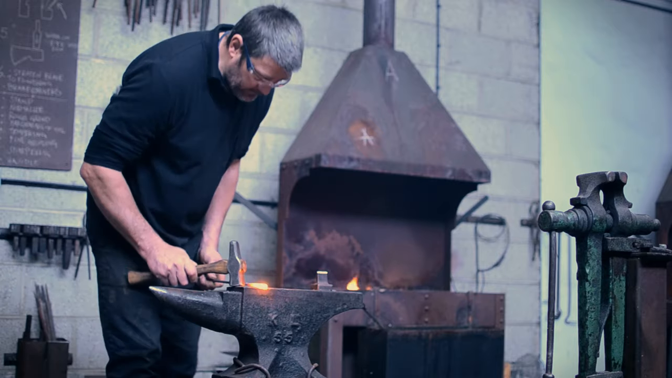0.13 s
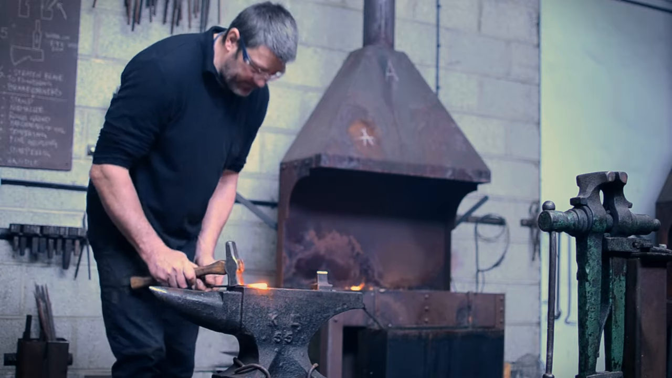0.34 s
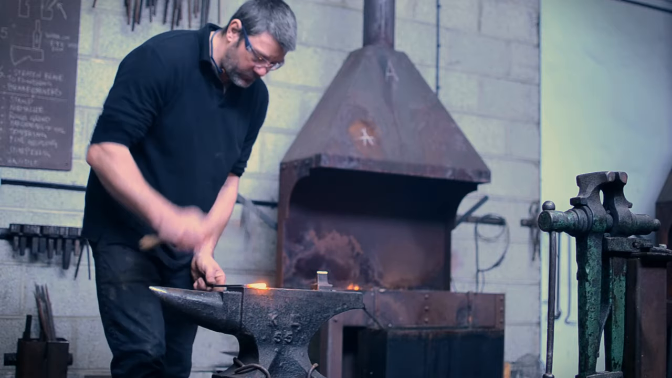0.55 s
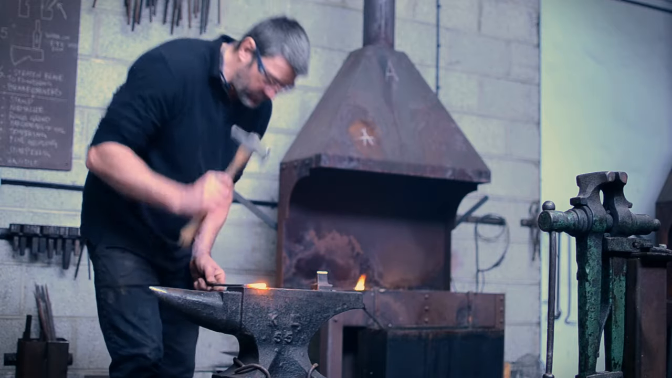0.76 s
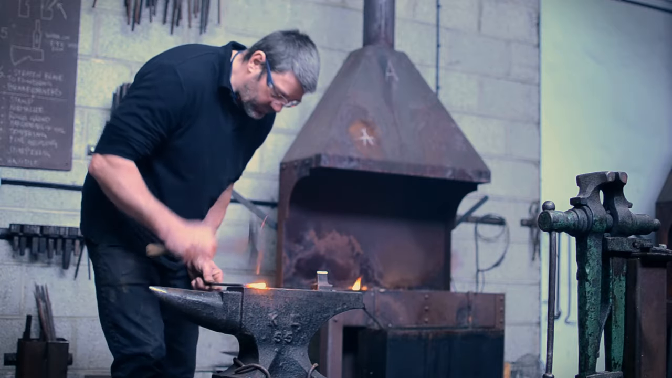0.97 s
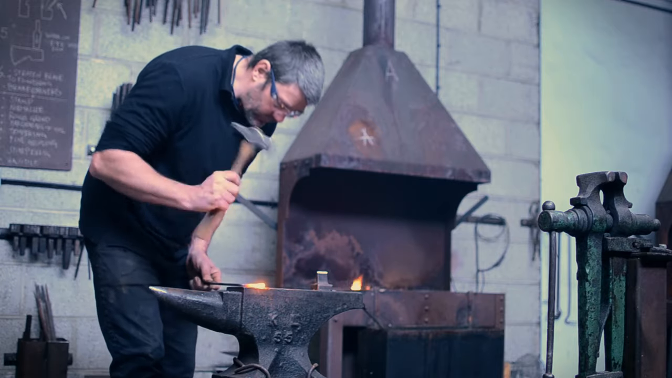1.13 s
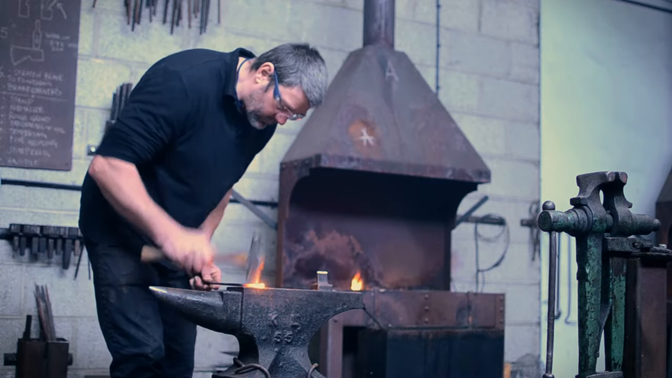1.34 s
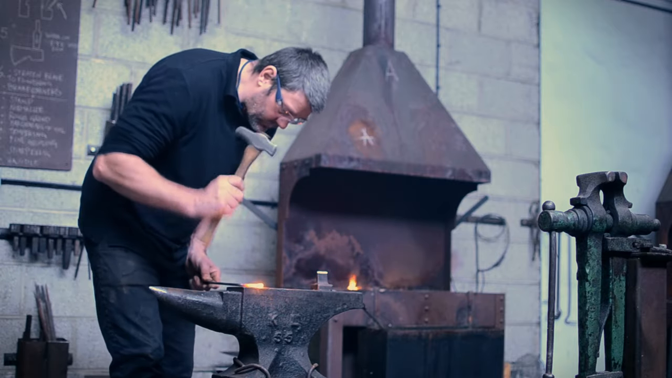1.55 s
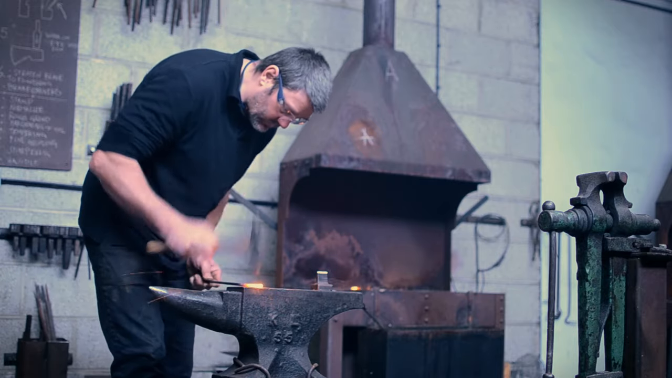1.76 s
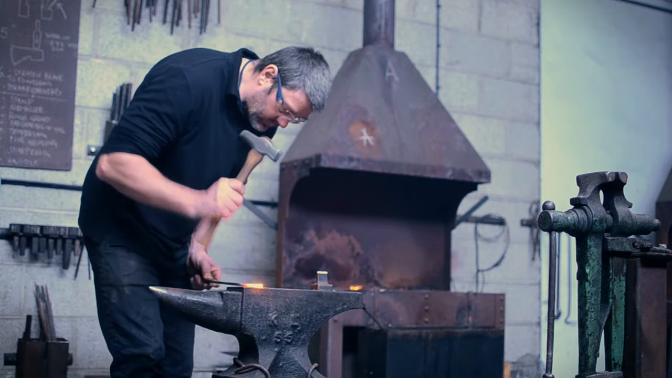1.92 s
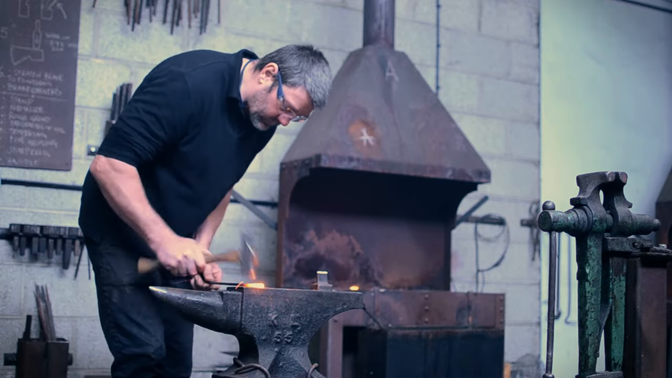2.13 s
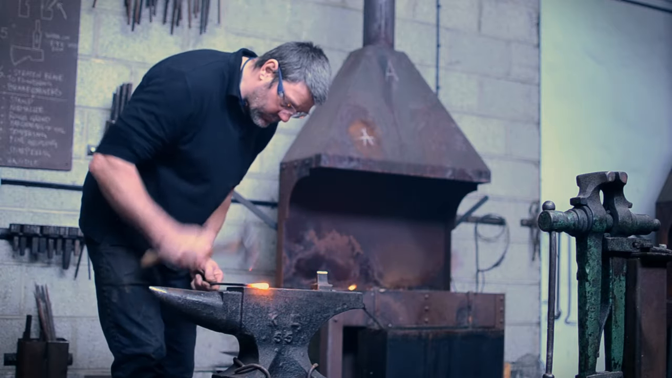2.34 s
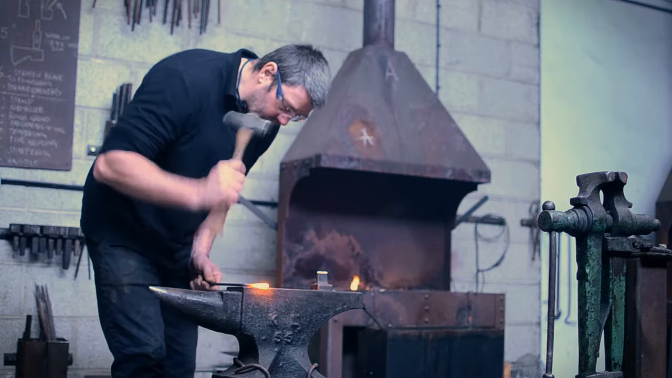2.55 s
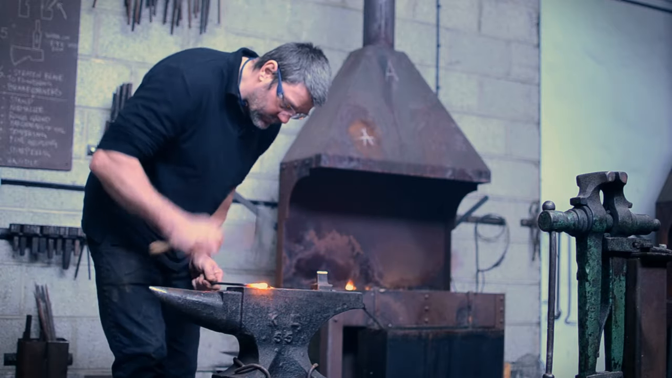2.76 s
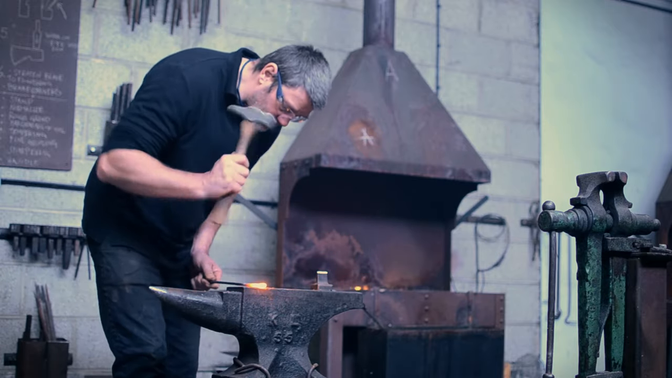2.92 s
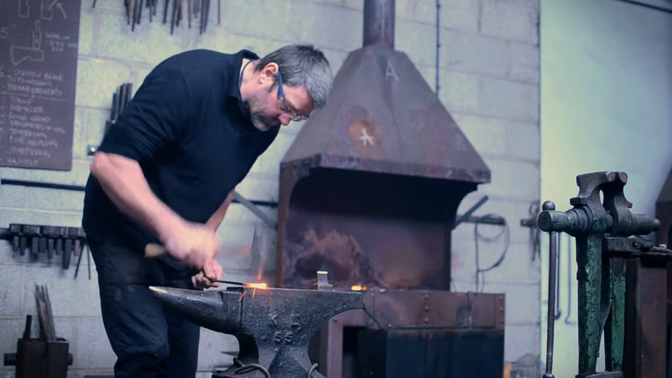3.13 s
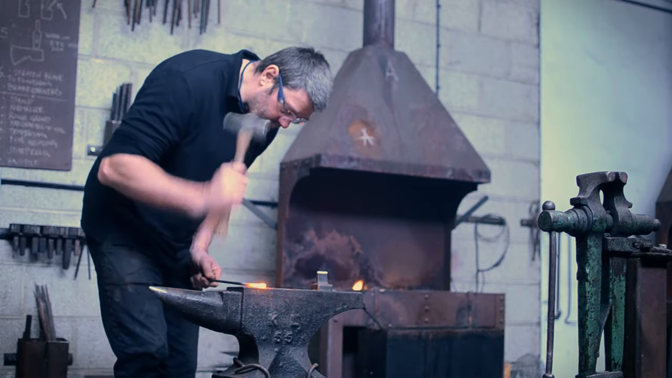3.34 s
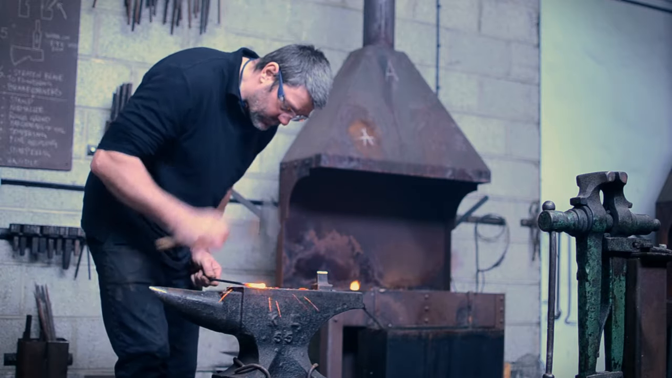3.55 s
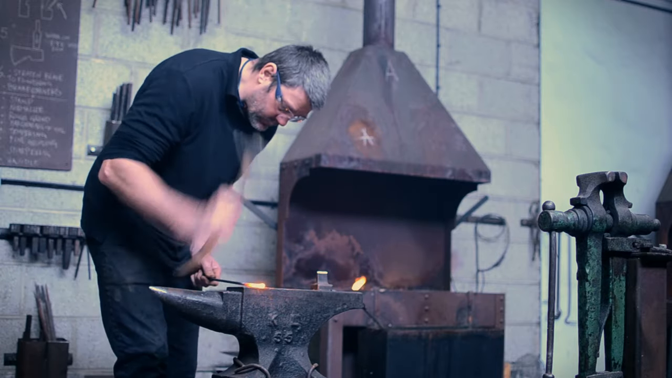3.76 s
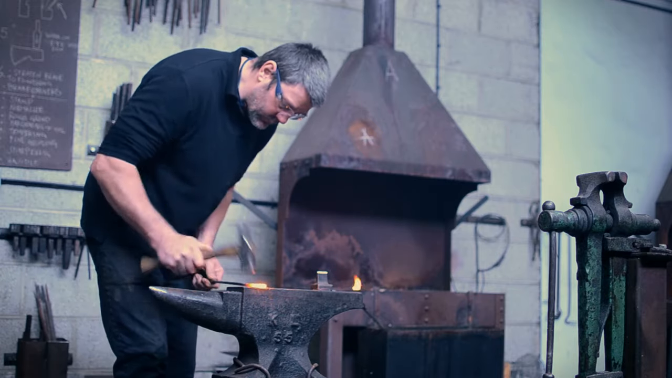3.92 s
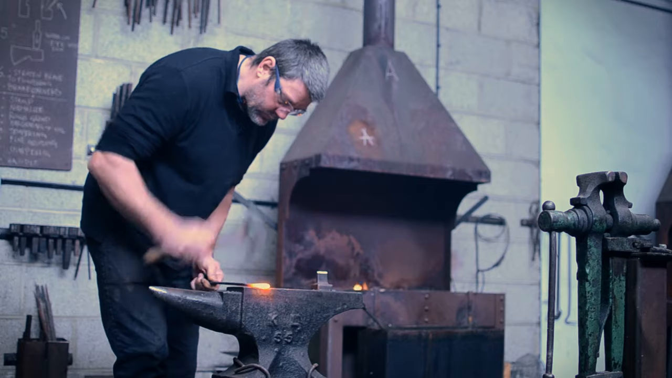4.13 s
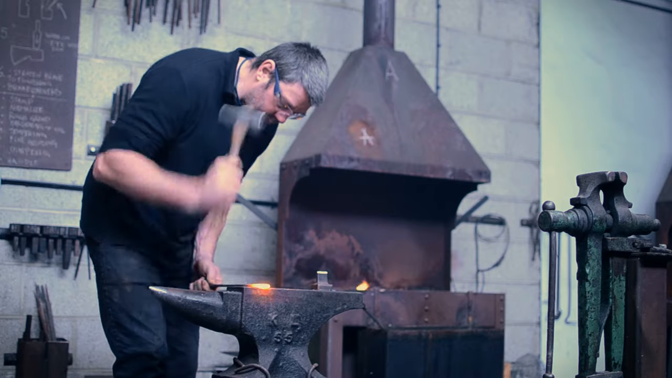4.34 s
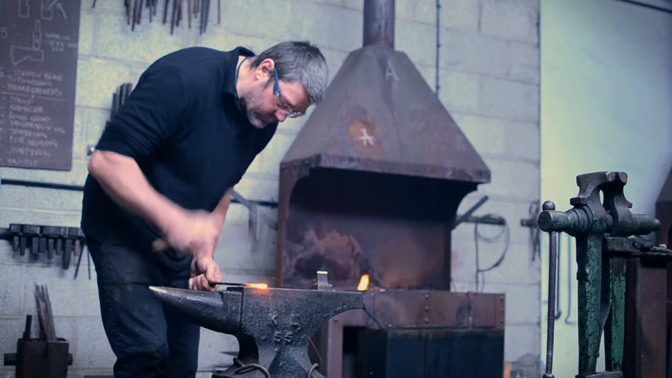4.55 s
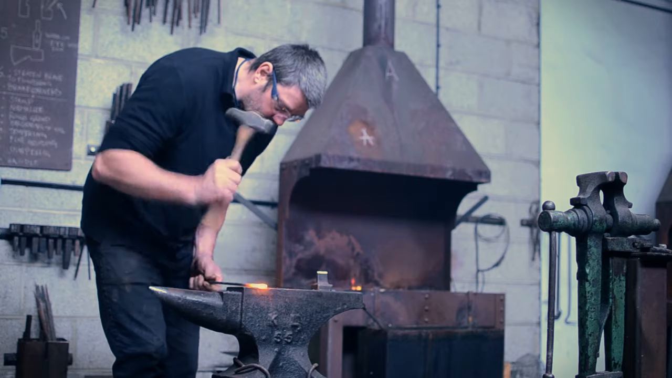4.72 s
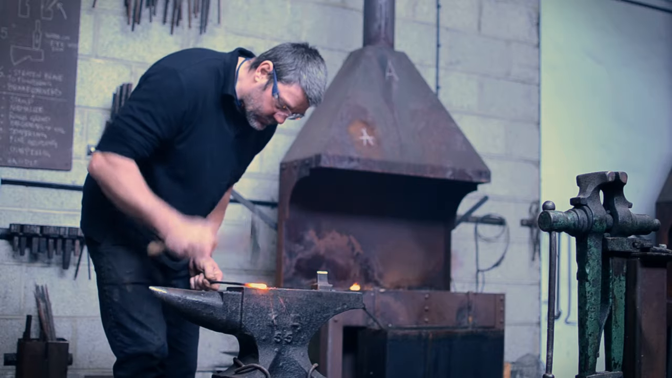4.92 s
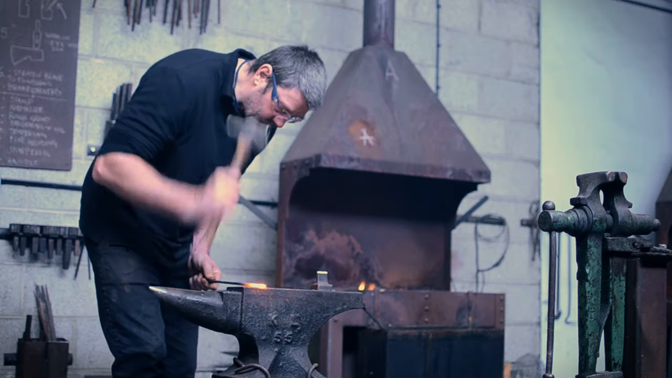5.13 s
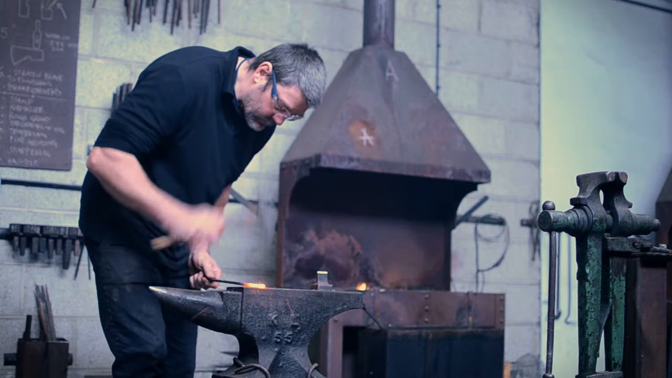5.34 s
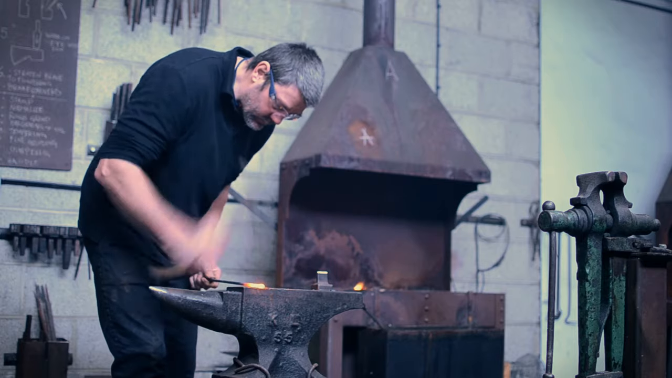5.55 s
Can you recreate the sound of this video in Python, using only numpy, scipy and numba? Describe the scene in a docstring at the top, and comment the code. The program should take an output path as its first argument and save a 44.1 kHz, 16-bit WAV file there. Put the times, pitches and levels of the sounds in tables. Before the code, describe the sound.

A hammer strikes hot steel on an anvil in steady ringing clanks, with a few higher taps, over a forge's soft rush.

```python
"""A block-walled workshop: a smith hammers a hot steel bar on an anvil, now and then tapping the bare face.
Each blow clanks as steel meets steel, rings the anvil's beating modes and fills the room with echoes
and a dense clang; the taps ring higher. Behind it, air hisses through the forge and the blower hums.
A limiter catches every blow a few milliseconds late, so the first crack gets through."""
import sys
import numpy as np
from scipy import signal
from scipy.fft import rfft, irfft, next_fast_len
from scipy.io import wavfile
from scipy.ndimage import map_coordinates
from numba import njit

SR = 44100
rng = np.random.default_rng(int(sys.argv[2]) if len(sys.argv) > 2 else 0)


def transcribe(u):
    """Save the signal u as a 16-bit wav file named by the first command-line argument.

    u: samples, shape (n,) or (channels, n), limited to [-1, 1]; the rate is SR.
    q: integer samples, one column per channel.
    """
    v = np.clip(np.atleast_2d(u).T, -1, 1)
    q = np.round(v * 32767).astype(np.int16)
    wavfile.write(sys.argv[1], SR, q)


N = 250488

# The anvil's modes: (frequency [Hz], level struck through the bar [dB], level struck on the face [dB],
# t60 [s], beat rate of the split mode [Hz], beat depth [0-1])
ANVIL_MODES = [(522, -40, -53, 1.2, 4, .4), (1099, -34, -42, .9, 6, .4), (1170, -44, -33, .8, 6, .4),
               (1595, -31, -37, .7, 5, .3), (1648, -28, -35, .8, 9, .3), (1902.5, -17, -26, .9, 6.9, .8),
               (2016, -22, -31.5, .95, 4.4, .45), (2353, -30, -32, .85, 8, .5),
               (2514, -34, -27, .95, 6, .4), (2553, -44, -26, .9, 5, .4), (2593, -34, -32, .95, 7, .4),
               (3331, -31.5, -38, 1.25, 6.6, .4), (3532, -42, -32, .9, 6, .5),
               (3900.5, -32.5, -18.5, .74, 4.8, .5), (4210, -45, -30, .7, 9, .5),
               (4323, -37, -27.5, .72, 7, .5), (4765, -54, -38, .8, 4, .6), (6168, -41, -36, .6, 9, .5),
               (6782, -49, -58, .65, 12, .5), (7574, -36, -37, .62, 5.6, .8), (8959, -52, -42, .55, 14, .3),
               (10365, -56, -68, .55, 8, .4), (12526, -53, -52, .66, 6, .6), (15035, -61, -53, .6, 11, .3)]
RING_TIME = np.arange(int(1.2 * SR)) / SR  # time axis of one strike [s]
RIPPLE_HZ = np.arange(0, 16000, 4)  # frequency axis of the ripple


def amp(db):
    """Decibels to gain."""
    return 10 ** (np.asarray(db) / 20)


def unit(x):
    """Scale to rms 1."""
    return x / np.sqrt(np.mean(np.abs(x) ** 2) + 1e-20)


def along(points, hz):
    """Read (frequency, value) points on a log frequency axis."""
    f, values = np.transpose(points)
    return np.interp(np.log(hz + 1), np.log(f + 1), values)


def filtered(x, response):
    """Shape x with a gain given as a function of frequency."""
    size = next_fast_len(len(x) + 8192)
    return irfft(rfft(x, size) * response(np.fft.rfftfreq(size, 1 / SR)), size)[:len(x)]


def wobble(rate, t):
    """A smooth random curve with rate knots per unit of t."""
    return map_coordinates(rng.standard_normal(512), [t * rate], mode="wrap")


def add(track, onset_s, sound):
    """Mix a sound into the track at its onset."""
    start = round(onset_s * SR)
    part = sound[max(-start, 0):N - start]
    track[max(start, 0):][:len(part)] += part


def forge():
    """Air rushes through the fire with a thin hiss on top, over the blower's slightly unsteady hum."""
    # The rush of air: (frequency [Hz], relative spectral density [dB])
    air_spectrum = [(25, -33), (50, -11), (95, -18), (150, 0.5), (240, 5), (480, 10), (680, 6), (880, 9.5),
                    (1400, 6), (3000, -0.5), (6500, -10.5), (8000, -11.5), (9500, -12), (15500, -42)]
    # The blower's tones: (frequency [Hz], rms level [dB])
    blower_tones = [(144.4, -57.5), (192.4, -50.5), (288.5, -55.5)]
    t = np.arange(N) / SR
    air = unit(filtered(rng.standard_normal(N), lambda f: amp(along(air_spectrum, f))))
    hiss = unit(filtered(rng.standard_normal(N), lambda f: amp(along([(9000, -20), (14000, 2)], f))))
    hum = np.zeros(N)
    for hz, db in blower_tones:
        peak = np.sqrt(2) * amp(db + 0.36 * wobble(7.2, t))
        hum += peak * np.sin(2 * np.pi * hz * t + 0.26 * wobble(5, t))
    return amp(-42 + 0.56 * wobble(8, t)) * air + amp(-63) * hiss + hum


def clang_ripple(depth_db):
    """A fine, fixed ripple colours the room's clang and gives it a metallic tone, alike from hit to hit."""
    return depth_db * wobble(1 / 32, RIPPLE_HZ)


def room_clang(spectrum, ripple_db, build_s):
    """The room's diffuse answer builds up quickly; its treble dies first."""
    # The workshop's reverb time: (frequency [Hz], t60 [s])
    room_t60 = [(150, .9), (500, 1.05), (2000, 1), (4000, .85), (8000, .66), (15000, .62)]
    colour = lambda f: amp(along(spectrum, f) + np.interp(f, RIPPLE_HZ, ripple_db))
    noise = unit(filtered(rng.standard_normal(len(RING_TIME)), colour))
    hz, t, bands = signal.stft(noise, SR, nperseg=256)
    decay = amp(-60 * t / along(room_t60, hz)[:, None])
    tail = signal.istft(bands * decay, SR, nperseg=256)[1]
    return tail[:len(RING_TIME)] * (1 - np.exp(-RING_TIME / build_s))


def wall_echoes(sound, echo_db, count=24):
    """The direct sound, then single echoes off the walls: duller, and weaker the later they come."""
    out = sound.copy()
    dull = filtered(sound, lambda f: 5000 / (5000 + 1j * f))
    for delay_s in rng.uniform(.008, .16, count):
        lag = int(delay_s * SR) + 1
        out[lag:] += amp(echo_db - 46 * delay_s + rng.normal(0, 3.5)) * dull[:-lag]
    return out


def steel_contact(crunch_t60, crunch_db):
    """A sharp push and a brief crunch excite the damped resonances of the colliding steel."""
    # Hammer head, bar and anvil as they touch: (frequency [Hz], bandwidth [Hz], relative level [dB])
    resonances = [(410, 430, -10), (1108, 155, 0.5), (1637, 268, 1.5), (2313, 530, -0.5), (2760, 504, -4),
                  (4156, 740, -17.5), (5770, 1550, -22), (9630, 1300, -29.5), (15000, 4400, -34.5)]
    push = unit(rng.standard_normal(len(RING_TIME))) * amp(crunch_db - 60 * RING_TIME / crunch_t60)
    push[0] += 1
    body = lambda f: sum((-1) ** k * amp(db) * 1j * f * width / (hz * hz - f * f + 1j * f * width)
                         for k, (hz, width, db) in enumerate(resonances))
    sound = filtered(push, body)
    return sound / np.abs(sound).max()


def anvil_ring(levels_db, scatter_db, waver):
    """Each mode is a close pair that swells and beats; the room makes it waver, the high ones most."""
    t, ring = RING_TIME, np.zeros(len(RING_TIME))
    knots = np.linspace(0, t[-1], 400)
    for (hz, _, _, t60, beat_hz, depth), db in zip(ANVIL_MODES, levels_db):
        flutter = (hz / 2400) ** .65
        drift = wobble(36 * flutter, knots) + 1j * wobble(36 * flutter, knots)
        pair = 1 - depth * np.exp(2j * np.pi * beat_hz * knots) + waver * flutter * drift
        envelope = np.abs(pair) * amp(db + scatter_db * rng.standard_normal() - 60 * knots / t60)
        phase = np.unwrap(np.angle(pair)) + 2 * np.pi * rng.random()
        ring += np.interp(t, knots, envelope) * np.sin(2 * np.pi * hz * t + np.interp(t, knots, phase))
    return ring * (1 - np.exp(-t / 0.00062))


def face_taps():
    """Hard steel on the bare face: a cleaner, brighter contact that wakes the higher modes."""
    # The hammer's taps: (time [s], hit gain [dB], ring gain [dB])
    strikes = [(-.04, -12, -10.5), (2.3005, 3, -3), (2.3332, -8, -2.5), (4.0863, 3, 1.5)]
    # The room's clang after a tap: (frequency [Hz], relative spectral density [dB])
    clang_spectrum = [(120, -42), (300, -23), (680, -21.5), (1150, -7.5), (1400, -13.5), (2150, -8),
                      (2560, 0.5), (3150, -15.5), (4330, -5), (4750, -20), (6200, -19.5), (8000, -37),
                      (9000, -43), (11000, -41)]
    track = np.zeros(N)
    ripple_db = clang_ripple(depth_db=0)  # flat: the taps' clang stays smooth
    for onset_s, hit_db, ring_db in strikes:
        contact = steel_contact(crunch_t60=0.041, crunch_db=-22.5)
        tick = filtered(contact, lambda f: 1j * f / (3000 + 1j * f))  # high-pass
        hit = wall_echoes(amp(2) * tick, echo_db=-18.5)
        hit += amp(-17.5) * room_clang(clang_spectrum, ripple_db, build_s=0.0025)
        ring = anvil_ring([mode[2] for mode in ANVIL_MODES], scatter_db=1.7, waver=0.37)
        add(track, onset_s, amp(hit_db) * hit + amp(ring_db) * ring)
    return track


def hammer_blows():
    """The soft hot bar cushions the hammer: a full knock, a thud in the stand and the low anvil modes."""
    # Blows on the bar: (time [s], relative force [dB], hardness [dB]: + a square hit, - a dull one)
    strikes = [(0.8922, -0.5, -1.8), (1.2978, 0, 0.5), (1.6878, -.5, 0), (2.0635, 1.3, 4),
               (2.6855, 3, -0.4), (3.078, -0.1, -2.5), (3.4646, 4.5, 1.5), (3.8458, -5.5, 0.2),
               (4.4678, 4.5, 2), (4.8632, 3.5, 0.5), (5.2491, 2.5, -.7), (5.6107, -1, -0.3)]
    # The room's clang after a blow: (frequency [Hz], relative spectral density [dB])
    clang_spectrum = [(70, -36), (230, -8), (520, -4.5), (1000, 2.5), (1350, -2.5), (1700, -1.5),
                      (2450, 0.5), (3050, -11.5), (4250, -10), (4600, -17.5), (7200, -20), (8000, -29),
                      (9200, -25), (15500, -36)]
    track, t = np.zeros(N), RING_TIME
    ripple_db = clang_ripple(depth_db=-1.5)
    for onset_s, force_db, hard_db in strikes:
        contact = steel_contact(crunch_t60=.035, crunch_db=-12)
        hit = wall_echoes(amp(-1) * contact, echo_db=-16.5)
        hit += amp(-15.5) * room_clang(clang_spectrum, ripple_db, build_s=0.0083)
        # A stronger blow clanks brighter, shakes the stand more and rings louder.
        knock_db = -3.3 + 0.33 * force_db + 0.34 * onset_s  # the body, fuller as the work goes on
        clank_db = -1.2 + 0.73 * force_db + hard_db  # the hard middle
        crack_db = 0.61 * force_db  # the sharp top
        tone = [(1080, knock_db), (2250, clank_db), (6000, crack_db)]  # (frequency [Hz], gain [dB])
        hit = filtered(hit, lambda f: amp(along(tone, f)))
        faint_thud = amp(-96 + 1.4 * force_db) * np.sin(2 * np.pi * 62 * t) * amp(-60 * t / .06)
        ring = anvil_ring([mode[1] for mode in ANVIL_MODES], scatter_db=0.27, waver=0.41)
        add(track, onset_s, hit + faint_thud + amp(force_db) * ring)
    return track


def scene():
    """Hammer, anvil and forge in one room, in mono."""
    return (hammer_blows() + face_taps() + forge())[None]


@njit
def follow(level, attack_s, release_s):
    """The limiter's level detector: it rises at the attack speed and falls at the release speed."""
    out, held = np.empty_like(level), 0.0
    for i in range(len(level)):
        held += (level[i] - held) / (SR * (attack_s if level[i] > held else release_s))
        out[i] = held
    return out


def record(dry):
    """A late limiter lets each attack through; soft clipping, microphone colour and a top cut follow."""
    # The microphone's notch in the high treble: (frequency [Hz], gain [dB])
    microphone = [(10400, 0), (11200, -8), (12000, -16), (12700, -11), (13600, 0)]
    threshold_db, ceiling, top_hz = -11, .76, 15780
    level = follow(np.abs(dry[0]), attack_s=.0016, release_s=.06)
    late_level = np.pad(level, (SR // 240, 0))[:N]  # about 4 ms behind
    limited = dry[0] / (1 + (late_level / amp(threshold_db)) ** 4) ** (1 / 4)
    clipped = ceiling * np.tanh(limited / ceiling)
    return filtered(clipped, lambda f: amp(along(microphone, f)) * (f < top_hz))[None]


dry = scene()
out = record(dry)
transcribe(out)
```